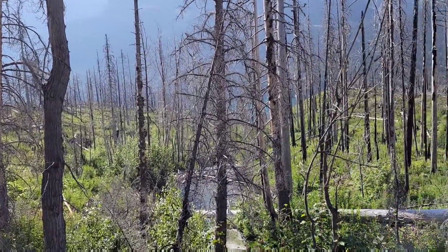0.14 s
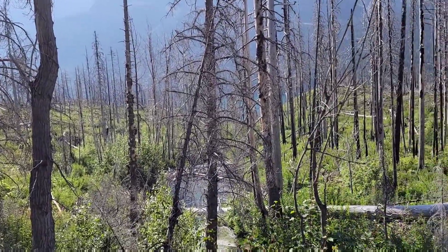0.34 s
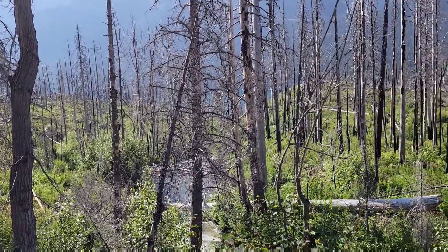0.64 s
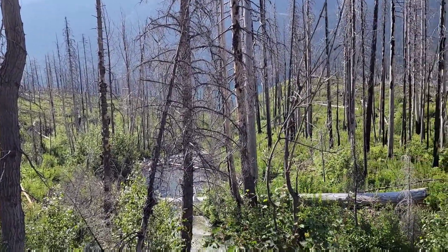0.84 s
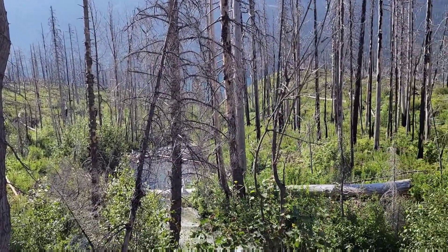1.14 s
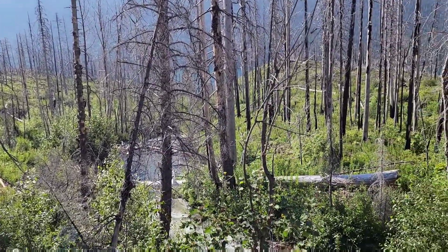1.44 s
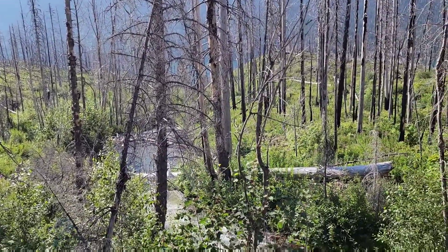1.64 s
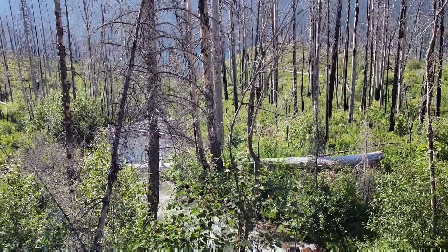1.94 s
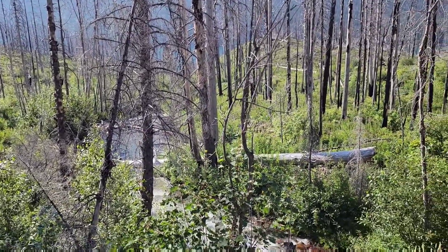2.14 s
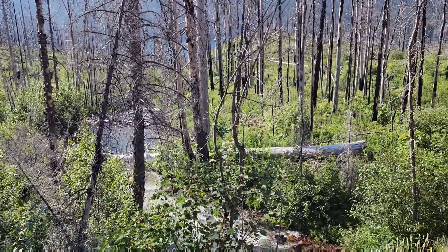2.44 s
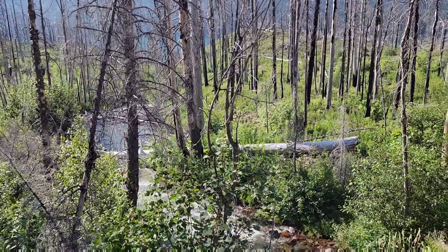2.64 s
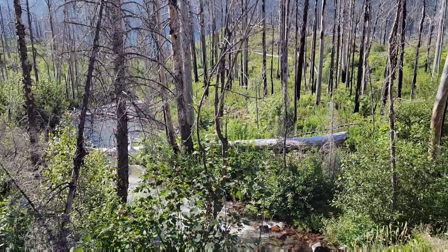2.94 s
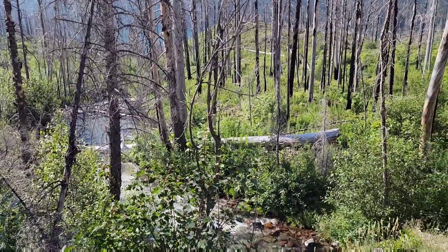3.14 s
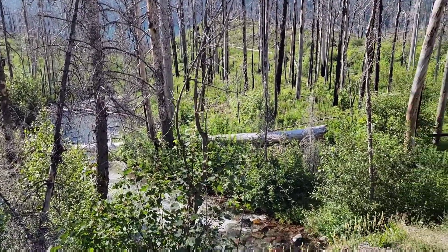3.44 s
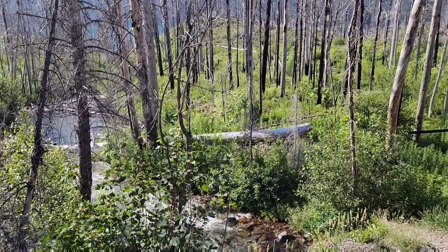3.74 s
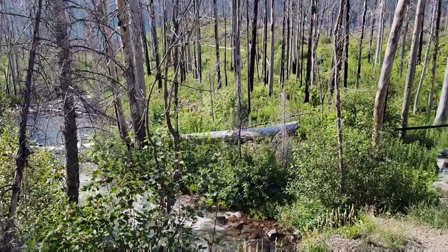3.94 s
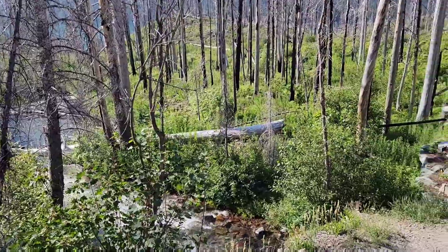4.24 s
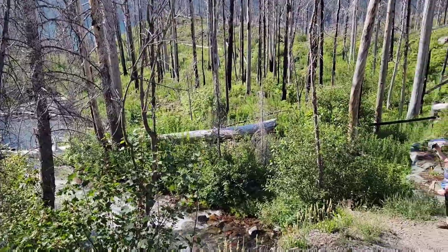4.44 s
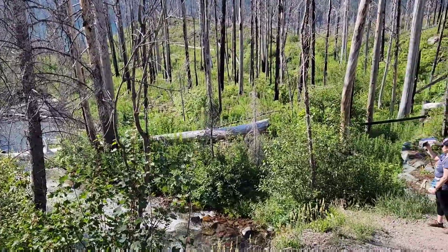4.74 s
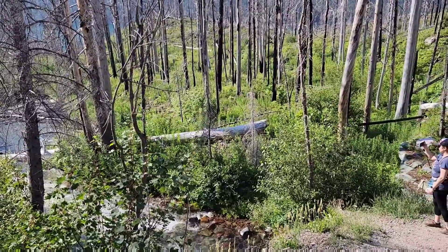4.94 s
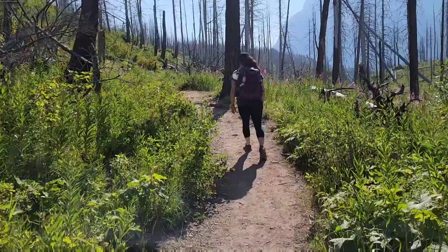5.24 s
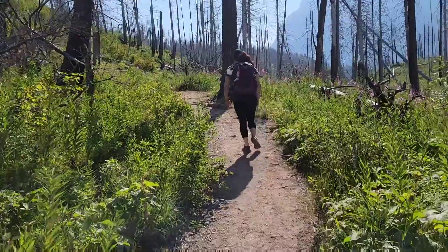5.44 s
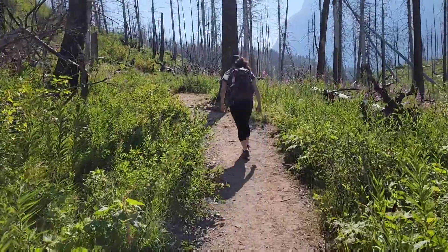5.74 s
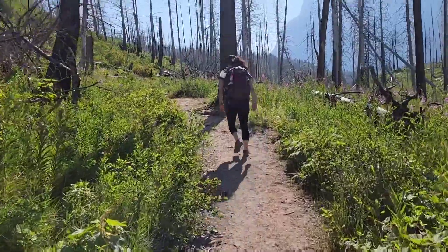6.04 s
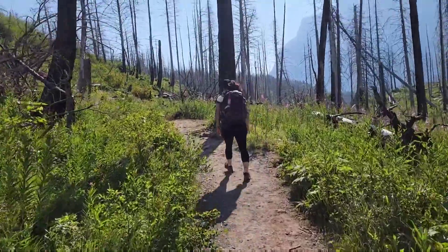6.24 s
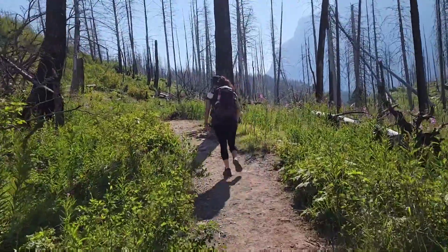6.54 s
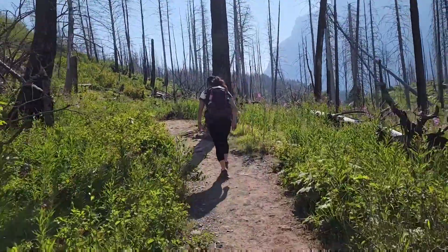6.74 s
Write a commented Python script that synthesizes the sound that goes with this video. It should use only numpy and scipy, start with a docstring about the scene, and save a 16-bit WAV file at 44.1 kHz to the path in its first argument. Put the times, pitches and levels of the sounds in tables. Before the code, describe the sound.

Outdoors on a handheld stereo microphone, continuous creek water gurgles and hisses with full low rumble and only small swells. It ends abruptly, leaving a blink of silence, then a hushed woodland path. Distant water and air murmur faintly while a few dry gritty footsteps crack and drag, low wind-like pushes thump softly, and a treble insect buzz swells toward the end.

```python
"""A creek rushes over stones below a bank: bursting bubbles and hiss, heard by a handheld camera
with two microphones that turns slowly. It stops hard, and after a short silence comes a quiet dirt trail:
boots crunch and scuff grit as struck, filtered noise, an insect buzzes in ringing treble pulses,
dry grass rustles as hiss, far water and air are shaped noise, and the bass surges in short low waves."""
import sys
import numpy as np
from scipy import signal
from scipy.io import wavfile
from scipy.ndimage import uniform_filter1d

SR = 44100
rng = np.random.default_rng(int(sys.argv[2]) if len(sys.argv) > 2 else 0)


def dump_mix(stems):
    """Bounce the given channels to the path in sys.argv[1] as a 16-bit WAV at rate SR."""
    frames = np.atleast_2d(stems).T  # one column per channel
    limited = np.clip(frames, -1, 1)  # hard clip at full scale
    pcm = np.round(limited * 32767).astype(np.int16)
    wavfile.write(sys.argv[1], SR, pcm)


N = 302967
CREEK_ENDS, TRAIL_STARTS = 5.1692, 5.2203  # s
SIZE, HOP = 4096, 1024  # spectrum frame and step, samples
HZ = np.fft.rfftfreq(SIZE, 1 / SR)  # frequency bins
FRAMES = np.arange(-(-N // HOP) + 1) * HOP / SR  # frame times, s

# The creek's low rumble at the two microphones, before its swells and the port resonance.
# Each row: frequency in Hz, left level in dB per Hz, right level in dB per Hz.
CREEK_RUMBLE = [(10, -77.5, -76.5), (25, -66.5, -64.5), (50, -55.5, -54.5), (70, -53.0, -51.5),
                (90, -54.0, -53.0), (115, -59.0, -58.0), (165, -60.0, -58.5), (230, -57.5, -55.5)]
# The water above the rumble as the camera first points; the bank's echo carves a dip near 500-650 Hz.
# Each row: frequency in Hz, left level in dB per Hz, right level in dB per Hz.
CREEK_AT_START = [(410, -60, -54.5), (485, -60.5, -60), (620, -61.0, -62.5), (765, -57.5, -58),
                  (1170, -61, -60), (1580, -63.5, -66), (1900, -64, -65), (2200, -68, -68),
                  (2440, -67.5, -68.5), (2800, -65.5, -66.5), (3580, -69, -65.5), (4280, -74.5, -67),
                  (6720, -78, -72.5), (8300, -81, -81.5), (9900, -85, -85.5), (15200, -87.5, -87.5)]
# The same water once the camera has turned.
# Each row: frequency in Hz, left level in dB per Hz, right level in dB per Hz.
CREEK_AFTER_TURN = [(406, -57.5, -55.5), (463, -64.5, -58.5), (540, -60, -58), (610, -61.5, -66),
                    (757, -55.5, -59.5), (1180, -61, -59.5), (1570, -63.5, -65.5), (2300, -68, -67),
                    (2800, -63.5, -61.5), (2960, -65.5, -64.5), (3500, -69, -66), (4530, -74, -68.5),
                    (7100, -76.5, -72.5), (8350, -80.0, -80.5), (9900, -83.5, -84.5), (15200, -86, -86)]
# How alike the two microphones hear the creek at first.
# Each row: frequency in Hz, likeness 0-1, lead of the right side in radians.
ALIKE_AT_START = [(20, .75, 0), (70, .96, -.1), (170, .96, -.1), (370, .7, -.2), (450, .15, -1.5),
                  (530, .65, -3.4), (630, .25, -5), (720, .55, -6.4), (920, .45, -6.6), (1020, .2, -7.4),
                  (1350, .75, -8.3), (1600, .15, -8.2), (1850, .58, -6.7), (2050, .35, -7.6),
                  (2300, .25, -10.8), (6000, .25, -7.5)]
# How alike they hear it after the turn.
# Each row: frequency in Hz, likeness 0-1, lead of the right side in radians.
ALIKE_AFTER_TURN = [(20, .6, -.3), (70, .87, -.2), (160, .95, -.1), (390, .7, -1.2), (450, .4, -1.9),
                    (560, .85, -3.1), (650, .1, -3.5), (720, .5, -1), (950, .7, -1.3), (1400, .82, -2.8),
                    (1750, .55, -2.4), (2300, .2, -4.6), (3050, .55, -2.6), (3400, .3, -1.4),
                    (6000, .22, -1.7)]
# How far the camera has turned. Each row: time in seconds, share of the turn 0-1.
TURN = [(0, 0), (1.8, 0.16), (2.6, 0.63), (3.1, 0.6), (4.4, 0.94), (5.2, 1)]
# Slow level changes of the water in three broad bands.
# Each row: time in seconds, change near 1000 Hz in dB, near 290 Hz in dB, below about 120 Hz in dB.
CREEK_BANDS = [(0, 0, -.5, -0.15), (.5, 0.049, -0.89, 2), (.85, .3, -0.3, 1.5),
               (1.05, 0.000061, -0.28, -1.6), (1.3, .4, -0.092, 1.6), (1.7, 1.1, 1, -2),
               (2.1, 1.1, .5, 0.19), (2.35, 1.3, 0, -1), (2.6, 1.5, 0, 1), (3.0, 1, 0, -0.56),
               (3.3, 0.5, 0, -0.57), (3.6, 0.91, 0.35, 2.7), (3.85, .6, 0.46, -1.4), (4.1, .7, -0.31, 0.47),
               (4.7, 0.69, 0.51, -2), (5.2, 1.3, 0.18, -1.6)]


def creek():
    """Bubbles and hiss over stones; the stereo picture slides as the camera turns."""
    turned = np.clip(curves(TURN, FRAMES)[0], 0, 1)
    start = field(CREEK_RUMBLE + CREEK_AT_START, ALIKE_AT_START)
    end = field(CREEK_RUMBLE + CREEK_AFTER_TURN, ALIKE_AFTER_TURN)
    left, right, like = (a + (b - a) * turned for a, b in zip(start, end))
    middle = np.exp(-np.log((HZ[:, None] + 1) / 1000) ** 2 / 0.19)
    gurgle = np.exp(-np.log((HZ[:, None] + 1) / 290) ** 2 / 0.15)
    bass = 1 / (1 + (HZ[:, None] / 120) ** 6)
    swell_db = rumble_swell()
    for band, db in zip((middle, gurgle, bass), curves(CREEK_BANDS, FRAMES)):
        swell_db = swell_db + band * db
    a, b = (bubbles(per_s=4000, spread_db=3.0, hiss=2.35, count=24) for _ in range(2))
    return heard(a, b, left + swell_db, right + swell_db, like, patchy_db=0.73)


def bubbles(per_s, spread_db, hiss, count=32):
    """Bursting bubbles: short rising rings from large to small, blurred by splashing hiss."""
    size = amp(spread_db * np.minimum(rng.exponential(1, N), 3.5))
    size = size * (rng.random(N) < per_s / SR)
    kind, out = rng.integers(0, count, N), np.zeros(N)
    for k, hz in enumerate(np.geomspace(180, 7000, count)):
        age = np.arange(int(30 * SR / hz)) * hz / SR  # in cycles
        envelope = np.exp(-age / 7.4) * (1 - np.exp(-age / 0.35))
        grain = np.sin(2 * np.pi * (age + 0.00826 * age ** 2)) * envelope
        grain = grain / np.linalg.norm(grain) * hz ** 0.16
        out += signal.oaconvolve(size * (kind == k), grain)[:N]
    return evened(out) + hiss * rng.standard_normal(N)


BOOTS_PAN_DB = -3  # left minus right: the steps lean to the right microphone
SETTLE_DB, SETTLE_S = -10, .025  # trickling grit before filtering, and its decay time
THUD_S = .003  # half length of the thud
# Grit crunching under a boot close to the microphones; levels are before panning.
# Each row: time of the peak in seconds, peak of the filtered grit in dB, lowest frequency in Hz,
# highest frequency in Hz, half length in seconds, thud frequency in Hz, thud level in dB.
CRACKS = [(5.5575, -42, 500, 1800, .003, 600, -52), (5.5654, -36, 700, 2500, .001, 1450, -52),
          (5.5672, -31.5, 600, 2300, .002, 1400, -44), (5.5745, -41, 1200, 2600, .001, 2000, -54),
          (5.6001, -32.5, 450, 1700, .0015, 900, -50), (5.622, -42, 350, 1100, .002, 500, -52),
          (6.151, -43, 800, 1500, .002, 1200, -52), (6.1582, -34, 650, 1300, .001, 1000, -43),
          (6.6064, -38, 600, 1700, .0015, 1150, -50), (6.6097, -35, 500, 1800, .002, 1150, -46),
          (6.6128, -36, 450, 1600, .002, 740, -47), (6.6153, -34.5, 600, 3200, .002, 700, -50),
          (6.6178, -35.5, 600, 3400, .002, 600, -50), (6.631, -37, 1500, 2900, .002, 2200, -50),
          (6.6344, -33, 900, 2800, .0015, 2300, -46), (6.6365, -28.5, 600, 3200, .002, 1400, -44),
          (6.639, -34, 350, 3000, .0015, 500, -40), (6.651, -41, 300, 4200, .002, 450, -50),
          (6.826, -39, 1500, 3000, .002, 2100, -50)]


def crunches():
    """Each crack is a snap in a short dull burst of grit over a thud, with a trickling tail."""
    out = np.zeros((2, N))
    t = np.arange(-800, 3200) / SR
    draws = rng.standard_normal((len(CRACKS), 3, len(t)))
    for (s, db, low, high, half, thud_hz, thud_db), draw in zip(CRACKS, draws):
        snap = -24 * (t == 0)
        trickle = amp(SETTLE_DB) * draw[1:] * (t > 0) * np.exp(-t / SETTLE_S)
        burst = draw[0] * stroke(t, 0, half) + snap + trickle
        dull = signal.lfilter(*signal.butter(1, 1900, fs=SR), burst)
        band = signal.butter(2, [low, high], "bandpass", fs=SR, output="sos")
        crack = signal.sosfilt(band, dull)
        thud = -amp(thud_db) * stroke(t, 0, THUD_S) * np.sin(2 * np.pi * thud_hz * t)
        add(out, s + t[0], sides(amp(db) * crack / abs(crack).max() + thud, BOOTS_PAN_DB))
    return out


DRAG_HZ_PER_S = 5500  # rise of the grit's pitch within each scuff
# Soles dragging over dirt and brushing dry grass; levels are before panning.
# Each row: time of the peak in seconds, half length in seconds, grit level in dB,
# grit frequency at the peak in Hz, grass level in dB.
SCUFFS = [(5.28, .06, -56, 2300, -76), (5.599, .05, -49, 2200, -74), (5.66, .04, -52, 2200, -75),
          (5.75, 0.055, -52, 2300, -67), (5.9, .04, -55, 2800, -72), (6.086, 0.091, -49, 2450, -66),
          (6.623, 0.025, -57, 2600, -63), (6.83, .05, -57, 2200, -61)]


def scuffs():
    """Many small grains ring under a dragged sole; the grit brightens as the sole speeds up."""
    out = np.zeros((2, N))
    t = np.arange(-SR // 4, SR // 4) / SR
    for s, half, db, hz, _ in SCUFFS:
        size = amp(1.9 * np.minimum(rng.exponential(1, (2, len(t))), 3))
        grains = size * (rng.random((2, len(t))) < 3000 / SR)  # 3000 grains a second on average
        grains = grains * rng.choice([-1, 1], grains.shape)
        centre = hz + DRAG_HZ_PER_S * np.clip(t, -half, half)
        grit = ring(ring(grains, centre, 720), centre, 720)
        add(out, s + t[0], sides(evened(grit) * amp(db) * stroke(t, 0, half), BOOTS_PAN_DB))
    return out


BUZZ_PER_S, BUZZ_PULSE_AT = 121.15, 7.1  # pulses a second; s of one pulse, which sets their timing
BUZZ_DRIFT = .007  # share by which the pitch wanders
# The insect's swelling treble, before panning.
# Each row: time in seconds, low mode level in dB, high mode level in dB.
BUZZ = [(5.23, -70, -80), (5.426, -76, -79), (5.714, -72, -79), (5.796, -77, -69), (5.842, -64, -78),
        (5.864, -76, -73), (5.97, -65, -66), (6.266, -59, -59), (6.39, -54, -64), (6.53, -59, -57),
        (6.618, -65, -63), (6.732, -56, -60), (6.746, -69, -64), (6.87, -60, -61)]
# The two ringing modes, before the pitch moves.
# Each row: frequency in Hz, width in Hz, left minus right in dB.
BUZZ_MODES = [(7180, 330, -3.), (9180, 280, 10)]
# The pitch lifts at the end. Each row: time in seconds, rise as a share of the pitch.
BUZZ_RISE = [(5.2, 0), (6.72, 0), (6.8, .022), (6.87, .025)]


def insect():
    """A membrane buckles in steady pulses; each rings two modes at a slightly new pitch, with a rattle."""
    t = np.arange(N) / SR
    turns = (t - BUZZ_PULSE_AT) * BUZZ_PER_S + .5
    pulse, phase = np.floor(turns).astype(int), turns % 1 - .5
    pulse = pulse - pulse[0]
    draws = rng.standard_normal((pulse[-1] + 1, 8))[pulse].T.reshape(2, 4, N)
    out = np.zeros((2, N))
    for (hz, width, pan_db), db, draw in zip(BUZZ_MODES, curves(BUZZ, t), draws):
        pitch, size, start, late = draw  # new for every pulse
        knots = rng.standard_normal(int(t[-1] * 10) + 2)
        wander = BUZZ_DRIFT * np.interp(t, np.arange(0, t[-1] + .1, .1), knots)
        hz = hz * (1 + curves(BUZZ_RISE, t)[0] + wander)
        shape = np.exp(-((phase - .04 * late) / .23) ** 2)
        cycles = (hz + .22 * width * pitch) * phase / BUZZ_PER_S
        tone = shape * amp(1.5 * size) * np.sin(2 * np.pi * cycles + 2 * start)
        rattle = ring(rng.standard_normal((2, N)), hz, 1.3 * width) * (.9 + shape)
        buzz = evened(evened(tone) + .6 * evened(rattle))
        out += sides(buzz * amp(db), pan_db)
    return out


GRASS_DB, GRASS_DB_PER_S = -84, 9  # steady rustle as the trail starts, and its growth; before panning


def rustle():
    """Dry grass as fine hiss, unrelated on the two sides, louder where a boot brushes through."""
    t = np.arange(N) / SR
    hiss = ring(ring(rng.standard_normal((2, N)), 13600, 5000), 13600, 5000)
    level = amp(GRASS_DB + GRASS_DB_PER_S * (t - TRAIL_STARTS))
    level = level + sum(amp(db) * stroke(t, s, half) for s, half, _, _, db in SCUFFS)
    return sides(evened(hiss) * level, -2.)


# The trail's low rumble at the two microphones, before its swells and the port resonance.
# Each row: frequency in Hz, left level in dB per Hz, right level in dB per Hz.
TRAIL_RUMBLE = [(10, -87.0, -87.5), (25, -77.5, -78.0), (50, -67.0, -66.5), (70, -63, -62.5),
                (90, -64.5, -63.5), (115, -66.5, -65.5), (165, -72, -71), (230, -76.5, -74.0)]
# Far water and air above the rumble.
# Each row: frequency in Hz, left level in dB per Hz, right level in dB per Hz.
TRAIL_AIR = [(332, -78.5, -73), (450, -76, -72), (553, -76, -71.5), (800, -74, -72.5), (1160, -76.5, -74.5),
             (1540, -80, -78.5), (2110, -83, -80), (3000, -85, -80.5), (3800, -89.5, -83.5),
             (4830, -93.5, -88.5), (5900, -94, -88.5), (7700, -90.5, -88), (9500, -92, -94.5),
             (10700, -101.5, -101.5), (15000, -104.0, -102.5)]
# How alike the two microphones hear the trail.
# Each row: frequency in Hz, likeness 0-1, lead of the right side in radians.
ALIKE_ON_TRAIL = [(20, .8, -.1), (70, .97, 0), (150, .97, .2), (300, .82, 1.1), (450, .75, 1.9),
                  (600, .87, 2.4), (850, .87, 3.1), (1200, .82, 3.5), (1600, .55, 3.6), (2200, .05, 3.5),
                  (2800, .4, 3.6), (3400, .4, 4.5), (4100, .1, 5.5), (7000, 0, 5.5)]


def trail_air():
    """Far water and moving air as smooth noise, closely related on both sides below 1.5 kHz,
    with the right side's phase leading more as frequency rises."""
    a, b = rng.standard_normal((2, N))
    left, right, like = field(TRAIL_RUMBLE + TRAIL_AIR, ALIKE_ON_TRAIL)
    swell_db = rumble_swell()
    return heard(a, b, left + swell_db, right + swell_db, like, patchy_db=1.4)


# The bass on the trail surges briefly; levels are before panning.
# Each row: time of the peak in seconds, peak level in dB, frequency in Hz, half length in seconds.
SURGES = [(5.285, -39, 70, .025), (5.376, -39, 80, .02), (5.522, -40, 70, 0.022), (5.698, -35, 75, .022),
          (5.836, -40, 55, 0.023), (5.977, -36, 95, .02), (6.029, -38, 62, .03), (6.18, -34.5, 70, .028),
          (6.292, -40, 62, .022), (6.761, -40, 55, .025)]


def surges():
    """Soft low pushes of a few cycles, alike on both sides."""
    out, t = np.zeros((2, N)), np.arange(-SR // 10, SR // 10) / SR
    for (s, db, hz, half), start in zip(SURGES, rng.random((len(SURGES), 1))):
        push = amp(db) * stroke(t, 0, half) * np.sin(2 * np.pi * (hz * t + start))
        add(out, s + t[0], sides(push, -.5))
    return out


SWELL_DB, SWELLS_PER_S = 0.5, 5.  # rms depth at the lowest bass; fastest rate


def rumble_swell(count=24):
    """dB by bin and frame: the bass wanders by chance around its mean level, the rest stays."""
    rates = np.geomspace(1, SWELLS_PER_S, count)[:, None]
    waves = np.sin(2 * np.pi * (rates * FRAMES + rng.random((count, 1)))) / np.sqrt(rates)
    swell_db = SWELL_DB * evened(waves.sum(0))
    swell_db = swell_db - 10 * np.log10(np.mean(amp(swell_db) ** 2))  # keeps the mean power
    return swell_db / (1 + (HZ[:, None] / 110) ** 8)


# Resonance of the microphone ports: one row of frequency in Hz, width in Hz, boost in dB.
PORT = (12700, 1060, 2.9)


def field(levels, alike):
    """Left dB, right dB and complex likeness of a sound field at every frequency bin."""
    like, lead = over_hz(alike)
    hz, width, db = PORT
    port_db = db * np.exp(-((HZ[:, None] - hz) / width) ** 2)
    left, right = over_hz(levels)
    return left + port_db, right + port_db, like * np.exp(1j * lead)


def heard(a, b, left_db, right_db, like, patchy_db):
    """Two unrelated streams, levelled per bin, become a microphone pair with drifting patches."""
    z = signal.stft(np.array([a, b]), nperseg=SIZE, noverlap=SIZE - HOP)[2]
    mean = uniform_filter1d(np.mean(abs(z) ** 2, 2), size=7, axis=1)
    window = signal.windows.hann(SIZE)
    white = np.sum(window ** 2) / np.sum(window) ** 2
    z = z * np.sqrt(white * SR / 2 / mean)[:, :, None]  # flat, 0 dB per Hz
    z = z * (HZ[:, None] > 15)
    patches = rng.standard_normal((z.shape[2], z.shape[1])).T
    patches = uniform_filter1d(patches, size=40, axis=0)  # across bins
    patches = evened(uniform_filter1d(patches, size=3, axis=1))  # across frames
    left = z[0] * amp(left_db)
    right = (like * z[0] + np.sqrt(1 - abs(like) ** 2) * z[1]) * amp(right_db)
    pair = np.array([left, right]) * amp(patchy_db * patches)
    return signal.istft(pair, nperseg=SIZE, noverlap=SIZE - HOP)[1][:, :N]


def over_hz(rows):
    """Columns of a table read at every frequency bin, on a log frequency scale."""
    hz, *columns = np.transpose(rows)
    return [np.interp(np.log(HZ + 1), np.log(hz + 1), c)[:, None] for c in columns]


def curves(rows, t):
    """Columns of a table read at the times t."""
    s, *columns = np.transpose(rows)
    return [np.interp(t, s, c) for c in columns]


def ring(x, hz, width):
    """One mode struck by x, dying away faster the wider it is; hz may be a curve."""
    turn = np.exp(2j * np.pi * np.cumsum(hz * np.ones(x.shape[-1])) / SR)
    r = np.exp(-np.pi * width / SR)
    return 2 * (turn * signal.lfilter([1 - r], [1, -r], x / turn)).real


def stroke(t, s, half):
    """A bell-shaped swell and fade around s."""
    return np.exp(-((t - s) / half) ** 2)


def sides(mono, pan_db):
    """Left and right, with pan_db as left minus right."""
    return mono * amp([[pan_db / 2], [-pan_db / 2]])


def add(mix, s, sound):
    """Lays a sound into the mix from second s, cut at the end."""
    part = mix[:, round(s * SR):][:, :sound.shape[1]]
    part += sound[:, :part.shape[1]]


def amp(db):
    """Amplitude factor of a level in dB."""
    return 10 ** (np.asarray(db) / 20)


def evened(x):
    """Scaled to an rms of 1."""
    return x / np.sqrt(np.mean(x ** 2) + 1e-20)


def scene():
    """The creek stops hard with a faint short tail; after a silence the trail starts."""
    t = np.arange(N) / SR
    after = np.maximum(t - CREEK_ENDS, 0)
    creek_gain = np.where(t < CREEK_ENDS, 1, amp(-20.5 - 930 * after))  # tail falls 930 dB a second
    trail = crunches() + scuffs() + insect() + rustle() + trail_air() + surges()
    return creek() * creek_gain + trail * (t >= TRAIL_STARTS)


EDGE_HZ = 15300  # upper limit


def record(dry):
    """The band limit of the recorder: a steep low-pass."""
    low_pass = signal.firwin(767, EDGE_HZ, window=("kaiser", 9), fs=SR)
    return signal.oaconvolve(dry, low_pass[None], "same")


dry = scene()
out = record(dry)
dump_mix(out)
```